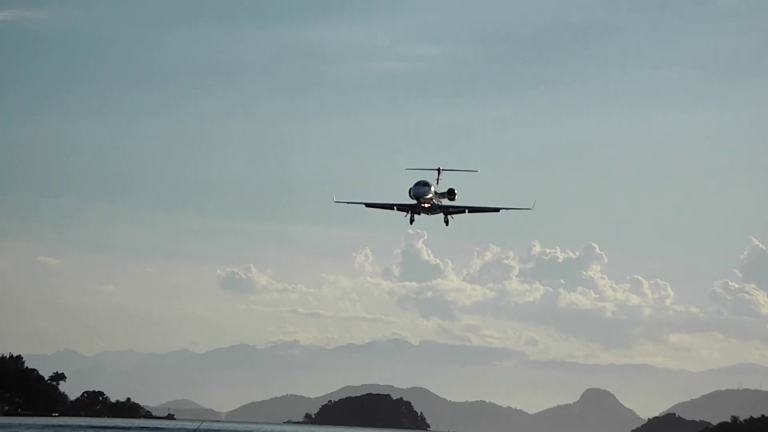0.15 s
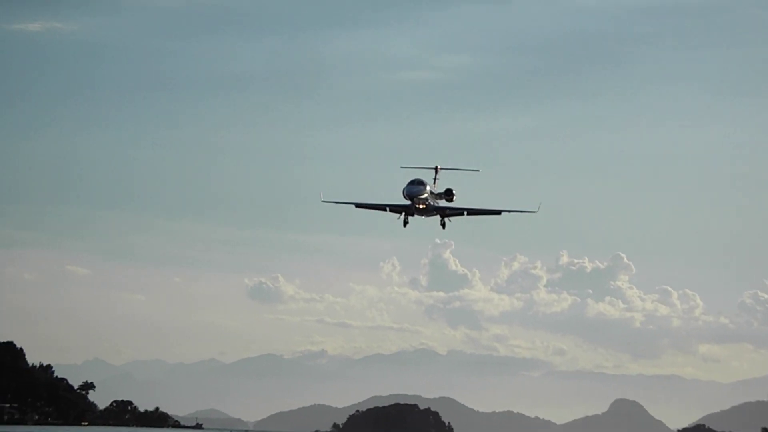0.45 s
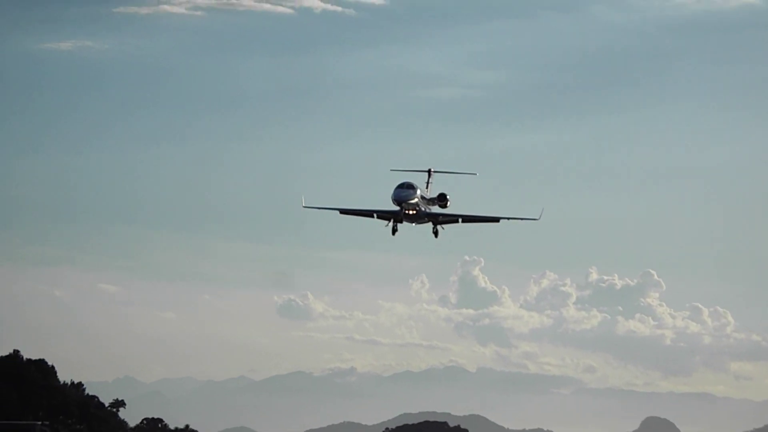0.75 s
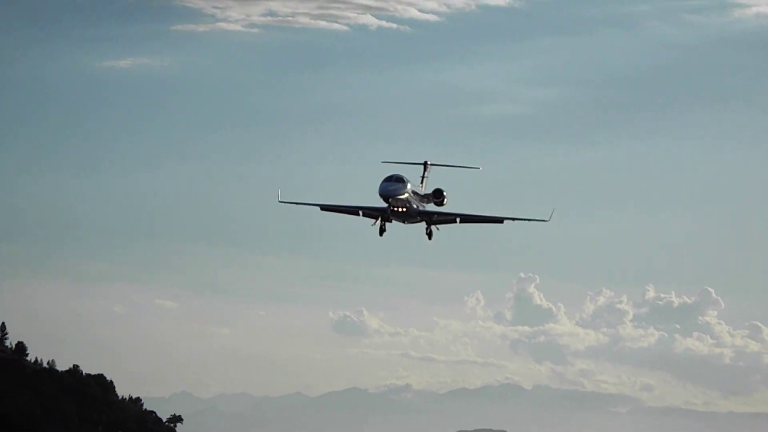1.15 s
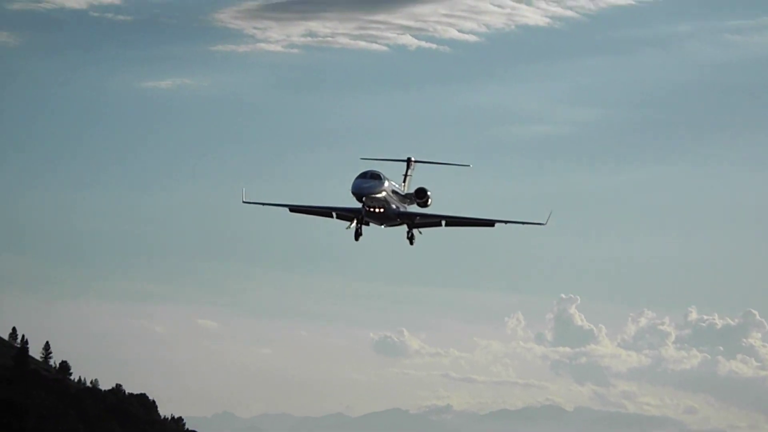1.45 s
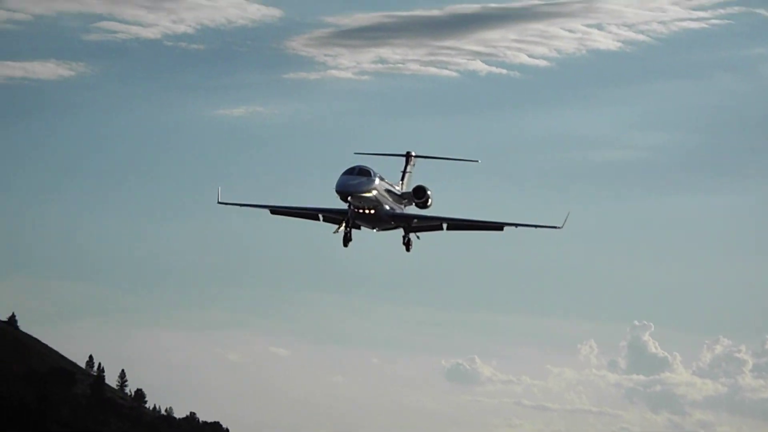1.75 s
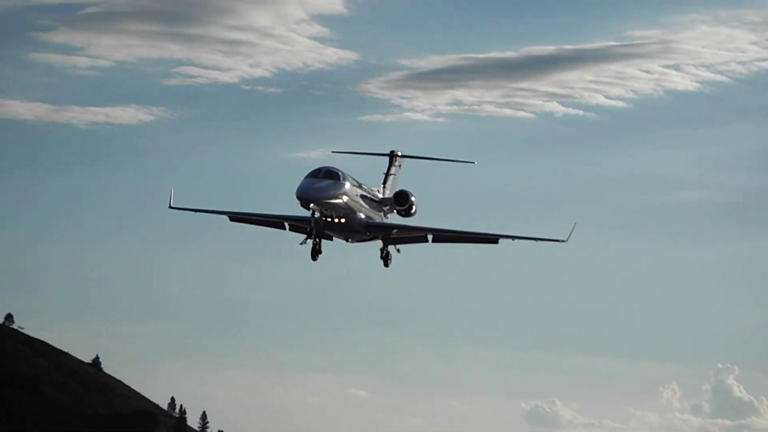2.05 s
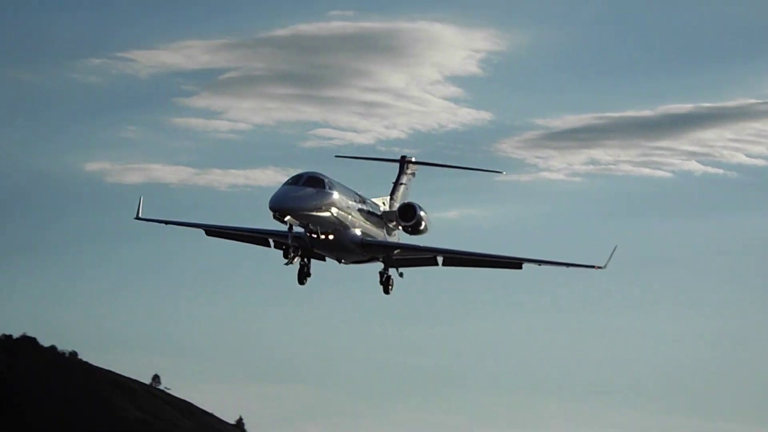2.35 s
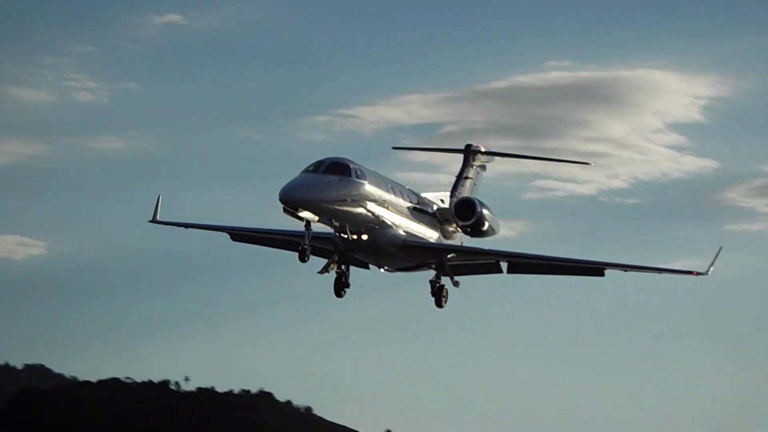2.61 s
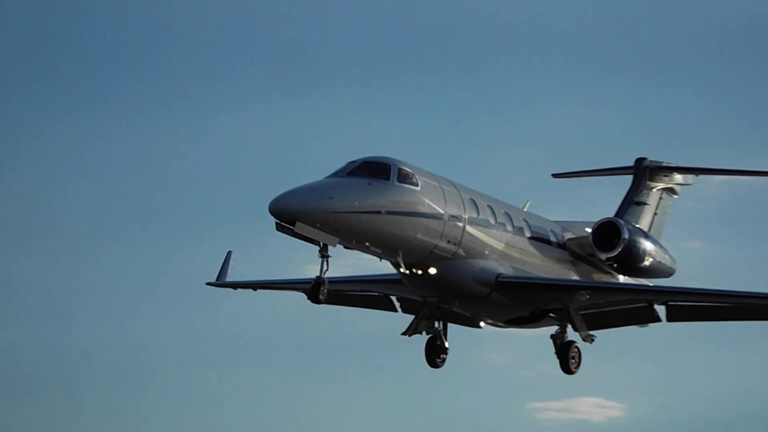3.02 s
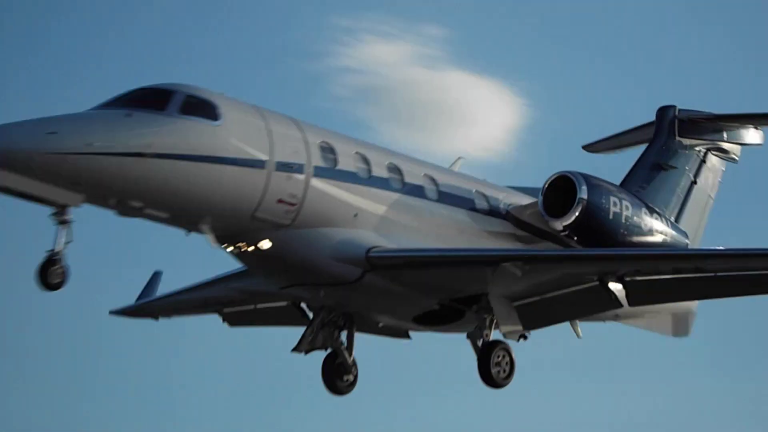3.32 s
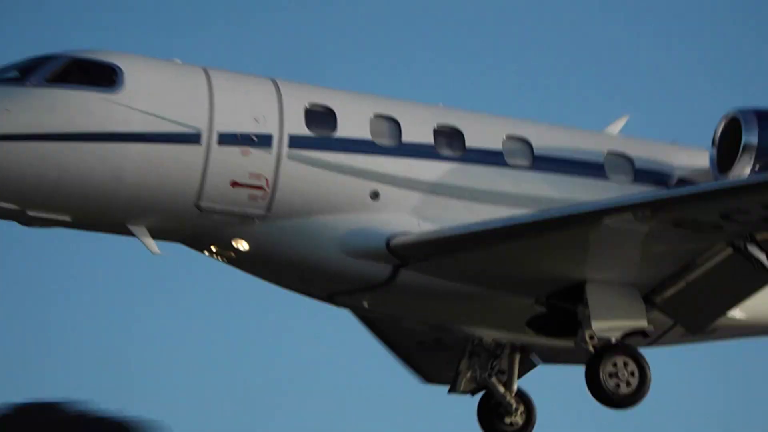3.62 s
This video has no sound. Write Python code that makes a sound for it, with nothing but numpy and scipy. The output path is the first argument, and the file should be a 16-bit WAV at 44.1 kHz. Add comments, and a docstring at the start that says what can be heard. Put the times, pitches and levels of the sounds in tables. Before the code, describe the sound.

Business jet approaches and passes low overhead, bright hissing roar with sinking turbine whine

```python
"""A twin-engine business jet comes in to land and passes low overhead of a pair of microphones.
Its roar is shaped noise, combed by a ground reflection that lags more and more as the jet rises in the sky.
Turbine whines, gliding tones and narrow hissing bands, sink as the engines wind down and the Doppler
shift fades, over a low engine hum. Uneasy air makes it all flutter, and the level dips briefly now and then."""
import sys
import numpy as np
from scipy.fft import rfft, irfft, next_fast_len
from scipy.io import wavfile
from scipy.ndimage import map_coordinates

SR = 44100
rng = np.random.default_rng(int(sys.argv[2]) if len(sys.argv) > 2 else 0)


def wav_record(signal):
    """Record a signal, one row per channel, as 16-bit PCM in the file named by sys.argv[1]."""
    frames = np.transpose(np.atleast_2d(signal))
    bounded = np.clip(frames, -1, 1)
    # unit amplitude maps onto the largest positive 16-bit level
    quanta = np.round(bounded * 32767).astype(np.int16)
    wavfile.write(sys.argv[1], SR, quanta)


N = 166257  # length in samples


def amp(db):
    """Decibels to gain."""
    return 10 ** (np.asarray(db) / 20)


def unit(x):
    """Scale to rms 1."""
    return x / np.sqrt(np.mean(np.abs(x) ** 2) + 1e-20)


def clock():
    """The time of every sample in seconds."""
    return np.arange(N) / SR


def along(points, hz):
    """Read (Hz, value) points on a log frequency axis."""
    point_hz, value = np.transpose(points)
    return np.interp(np.log(hz + 1), np.log(point_hz + 1), value)


def curves(rows):
    """One value per sample for each column after the time."""
    seconds, *columns = np.transpose(rows)
    return [np.interp(clock(), seconds, column) for column in columns]


def wobble(rate):
    """A smooth random curve, rate knots a second."""
    knots = rng.standard_normal(4096)
    return map_coordinates(knots, [clock() * rate], mode="wrap")


def filtered(x, response):
    """Shape x by a gain that depends on frequency."""
    padded = next_fast_len(N + SR // 2)
    hz = np.fft.rfftfreq(padded, 1 / SR)
    return irfft(rfft(x, padded) * response(hz), padded)[..., :N]


def noise(colour):
    """Stereo noise of a given colour: a strong middle and a weak side make both ears nearly alike."""
    # Likeness of left and right. Each row: frequency in Hz, correlation from 0 to 1.
    likeness = [(25, .75), (60, .96), (125, .994), (1000, .997), (2400, .992), (5000, .96), (12000, .94)]

    def response(hz):
        turn = np.arccos(np.clip(along(likeness, hz), -1, 1)) / 2
        inside = (hz > colour[0][0] / 2) & (hz < colour[-1][0])
        return inside * amp(along(colour, hz)) * np.array([np.cos(turn), np.sin(turn)])

    mid, side = filtered(rng.standard_normal((2, N)), response)
    return unit(np.array([mid + side, mid - side]))


def band(level, colour, trim_db, flicker_db):
    """One band of noise, flickering in the moving air."""
    level_db, = curves(level)
    flicker = amp(flicker_db * wobble(60))
    return amp(level_db + trim_db) * unit(flicker * noise(colour))


def over_ground(x, lag_ms, share):
    """The direct sound plus its ever later reflection: a comb that sweeps down."""
    heard_at = np.arange(N) - lag_ms * SR / 1000
    mirror = np.array([map_coordinates(ear, [heard_at], order=3, mode="mirror") for ear in x])
    return (x + share * mirror) / np.sqrt(1 + share ** 2)


def jet_noise():
    """Exhaust, airframe and intake noise comes direct and off the ground, which scatters the highest fizz."""
    # Levels of six noise bands before trim. Each row: time in seconds, level in dB.
    rumble_level = [(0.0, -47.5), (1.0, -43.5), (2.72, -48), (3.31, -46), (3.47, -52), (3.77, -43.5)]
    roar_level = [(0.0, -36.5), (1.12, -28.5), (1.73, -33.5), (2.37, -28.5), (2.88, -32.5), (3.0, -29.5),
                  (3.59, -35.5), (3.77, -28)]
    rush_level = [(0.03, -28), (0.98, -17.5), (1.37, -19.5), (1.75, -17.5), (2.54, -19.5), (3.28, -18.5),
                  (3.5, -22.5), (3.77, -22.5)]
    hiss_level = [(0.03, -27), (0.68, -20.5), (1.37, -14.5), (2.2, -16), (2.96, -15.5), (3.45, -16),
                  (3.7, -14)]
    fizz_level = [(0.03, -42.5), (1.13, -32), (1.21, -35.5), (1.69, -28), (3.41, -23.5), (3.5, -26),
                  (3.56, -22), (3.77, -23)]
    air_level = [(0.3, -67), (0.89, -48), (1.18, -51), (1.64, -45), (3.77, -36)]
    # Their spectra. Each row: frequency in Hz, relative density in dB per Hz.
    rumble_colour = [(25, -36), (60, -26), (120, -14), (210, -10.5), (320, 0), (400, -5), (560, -16)]
    roar_colour = [(330, -22), (480, -9), (700, -1), (1000, 0), (1350, -2), (1800, -11.5)]
    rush_colour = [(1100, -69), (1450, -7), (1700, -2.5), (2400, 0.5), (3000, 0), (3900, 4), (4400, -4),
                   (5200, -33)]
    hiss_colour = [(3400, -31), (4300, -2.5), (5300, 2.5), (6000, -1.5), (6800, -7), (7400, -21),
                   (8400, -25)]
    fizz_colour = [(6000, -19), (7100, 1.5), (8000, -2.5), (9000, -8), (10300, -13), (11500, -29)]
    air_colour = [(9300, -28), (10600, -1), (12000, -5.5), (14000, -15.5), (15600, -22)]
    # Reflection off the ground. Each row: time in seconds, lag in ms,
    # share of the treble returned, share of the roar returned (both as amplitude ratios).
    ground = [(0, .71, .25, .1), (.5, .88, .42, .15), (1, 1.006, .42, .2), (1.5, 1.174, .5, .4),
              (1.75, 1.293, .48, .45), (2, 1.46, .42, .5), (2.5, 1.83, .4, .6), (2.75, 2.11, .38, .6),
              (3, 2.39, .32, .58), (3.35, 2.99, .2, .5), (3.77, 3.7, .12, .3)]

    lag_ms, treble_share, roar_share = curves(ground)
    low = band(rumble_level, rumble_colour, trim_db=0.5, flicker_db=1.0)  # exhaust
    low += band(roar_level, roar_colour, trim_db=0.5, flicker_db=0.82)
    treble = band(rush_level, rush_colour, trim_db=-0.5, flicker_db=0.5)  # airframe
    treble += band(hiss_level, hiss_colour, trim_db=-2, flicker_db=0.48)  # intake
    top = band(fizz_level, fizz_colour, trim_db=-1, flicker_db=1.1)
    top += band(air_level, air_colour, trim_db=-1, flicker_db=1.5)
    return over_ground(low, lag_ms, roar_share) + over_ground(treble, lag_ms, treble_share) + top


def tone(hz, width_hz, fuzz):
    """A gliding line; the share fuzz of its power is smeared into a narrow band by turbulence."""
    fuzz = np.clip(fuzz, 0, 1)
    smear = unit(wobble(2 * width_hz) + 1j * wobble(2 * width_hz))
    envelope = np.sqrt(1 - fuzz) + np.sqrt(fuzz) * smear
    carrier = np.exp(2j * np.pi * np.cumsum(hz) / SR)
    return np.sqrt(2) * np.real(envelope * carrier)


def turbines():
    """The main whine, surging between brief fades, and the blade tones that go along with it."""
    # Pitch of the main whine. Each row: time in seconds, frequency in Hz.
    whine_pitch = [(0, 7200), (.4, 7062), (1, 6761), (1.6, 6513), (2.2, 6266), (2.8, 6029), (3.1, 5900),
                   (3.4, 5675), (3.55, 5475), (3.77, 5100)]
    # Its level between fades. Each row: time in seconds, level in dB.
    whine_level = [(0, -39), (.65, -38), (.95, -25), (1.35, -36), (1.52, -32), (1.6, -24), (1.68, -33),
                   (1.85, -32), (2.12, -19.5), (2.32, -21.5), (2.42, -16), (2.54, -21.5), (2.63, -19),
                   (2.8, -18), (2.97, -21), (3.2, -19.5), (3.42, -16), (3.55, -23), (3.77, -34)]
    # Moments when it fades out for an instant, in seconds.
    fade_times = [.76, 2.055, 2.225, 2.345, 2.525, 2.695, 2.875, 3.02, 3.118, 3.305]
    # Blade tones and narrow hissing bands, each beamed at the listener for a while.
    # Each row: ratio to the whine, drift of the log ratio per second, peak level in dB,
    # time of the peak in seconds, half length in seconds, line width in Hz.
    blades = [(.358, -.056, -29.5, .6, .72, 22), (.358, -.056, -28.5, 1.9, .33, 8),
              (.641, .029, -29.5, .85, .6, 14), (.641, .029, -28.5, 2.05, .25, 8),
              (.775, -.015, -25, .7, .48, 80), (1.36, -.016, -35.5, 1.03, .3, 34),
              (1.36, -.016, -34.5, 2, .38, 40), (1.423, -.017, -41, 1.25, .5, 36),
              (2.14, -.031, -59, 1.2, .5, 35), (.258, 0, -28, 1.4, .55, 170),
              (.46, .085, -26, .75, .42, 170), (.46, 0, -28, 2.9, .4, 110), (.668, 0, -23, 1.33, .12, 50),
              (1.31, 0, -30.5, 3.1, .4, 60), (1.304, 0, -23, 3.64, .17, 32), (.395, 0, -30.5, 3.36, .2, 20),
              (.94, 0, -24.5, 3.62, .08, 200), (.228, 0, -34.5, .1, .45, 170), (1.07, 0, -43, .35, .6, 130),
              (.722, 0, -26, 1.3, .2, 110), (.56, 0, -26.5, 1.2, .17, 170), (.305, 0, -32, 2.73, .16, 30),
              (.99, 0, -26, 3.7, .12, 130)]
    fade_depth_db, fade_half_s = 12, .017
    flutter_db = 1.6
    pure_hiss_hz = 100  # lines this wide or wider are pure hiss

    t = clock()
    whine_hz, = curves(whine_pitch)
    level_db, = curves(whine_level)
    fade_db = fade_depth_db * sum(np.exp(-((t - s) / fade_half_s) ** 2) for s in fade_times)
    flutter = amp(flutter_db * wobble(45.04))
    whine = unit(flutter * tone(whine_hz, width_hz=79, fuzz=0.096))
    out = amp(level_db - fade_db) * whine
    for ratio, drift, peak_db, peak_s, half_s, width_hz in blades:
        beam = amp(peak_db) * np.exp(-((t - peak_s) / half_s) ** 2)
        blade_hz = whine_hz * ratio * np.exp(drift * t)
        flutter = amp(flutter_db * wobble(45))
        out += beam * unit(flutter * tone(blade_hz, width_hz, fuzz=width_hz / pure_hiss_hz))
    return out


def hum():
    """A low engine tone, nearly steady, that only sinks clearly once the jet is nearly overhead."""
    # The hum's glide. Each row: time in seconds, frequency in Hz, level in dB.
    hum_glide = [(0, 480, -47.5), (.35, 478, -44.5), (.7, 476, -46.5), (1.6, 481, -48.5),
                 (2.35, 479.7, -38.7), (2.8, 478.6, -44), (3.05, 465, -41.5), (3.55, 441, -52),
                 (3.77, 425, -54)]
    hz, level_db = curves(hum_glide)
    return amp(level_db) * tone(hz, width_hz=10, fuzz=.25)


def dips():
    """A gain that drops quickly and soon recovers."""
    # Brief dips in level. Each row: start in seconds, nominal depth in dB (recovery cuts it short).
    dip_rows = [(.875, 5), (0.978, 5.5), (1.156, 6), (1.19, 7), (1.25, 12), (1.296, 11), (1.56, 12),
                (1.835, 8), (2.821, 6.5), (2.86, 6), (2.89, 9), (3.088, 9), (3.505, 8)]
    fall_s, recover_s = 0.0037, 0.01
    down_db = np.zeros(N)
    for start_s, depth_db in dip_rows:
        age = np.maximum(clock() - start_s, 0)
        down_db += depth_db * (1 - np.exp(-age / fall_s)) * np.exp(-(age / recover_s) ** 2)
    return amp(-down_db)


def scene():
    """The whole jet, fluttering as one and drifting to the left as it arrives."""
    # The jet's drift across the stereo field. Each row: time in seconds, left minus right in dB.
    drift_rows = [(1.2, -.25), (2.9, .25), (3.6, 1.1)]
    pan_db, = curves(drift_rows)
    jet = jet_noise() + turbines() + hum()
    flutter = amp(0.67 * wobble(60))  # dB
    pan = amp(np.outer([.5, -.5], pan_db))
    return jet * flutter * dips() * pan


def record(dry):
    """The two microphones differ a little; nothing is kept above the band limit."""
    # Balance of the microphones. Each row: frequency in Hz, left minus right in dB.
    balance = [(900, -.2), (2000, -.5), (5000, -.8), (8500, -2.3), (13000, -.4)]
    top_hz = 15650

    def response(hz):
        return amp(np.outer([.5, -.5], along(balance, hz))) * (hz < top_hz)

    return filtered(dry, response)


dry = scene()
out = record(dry)
wav_record(out)
```